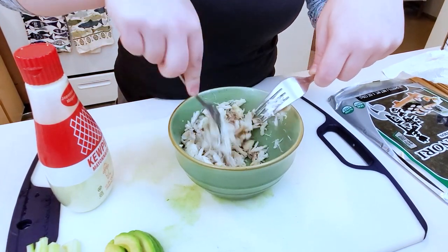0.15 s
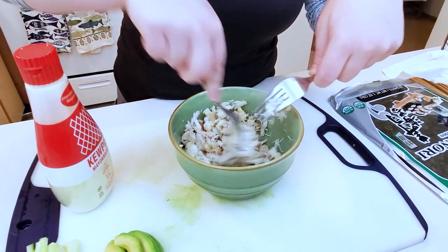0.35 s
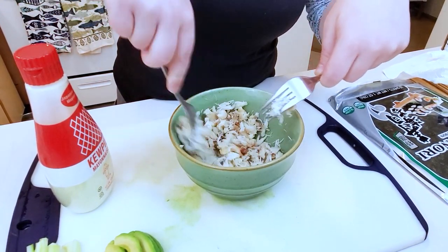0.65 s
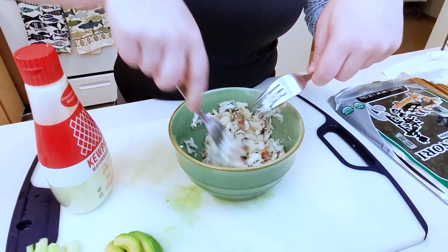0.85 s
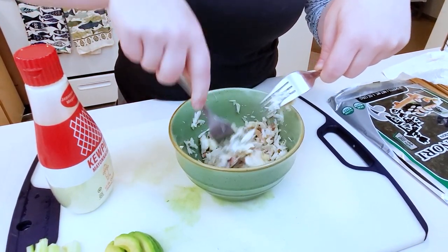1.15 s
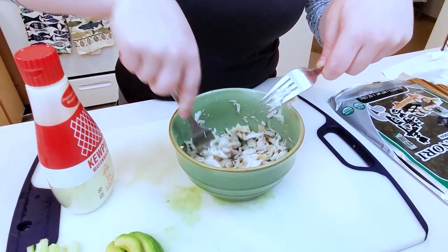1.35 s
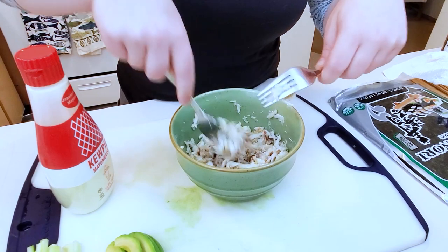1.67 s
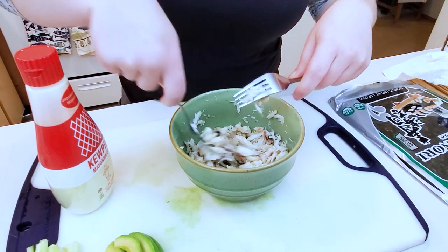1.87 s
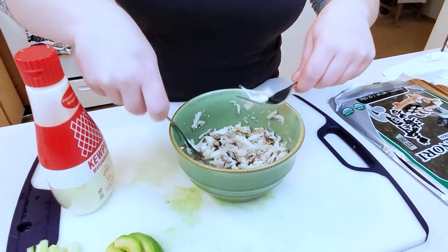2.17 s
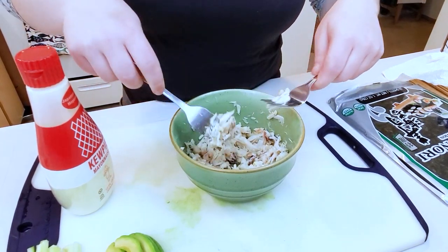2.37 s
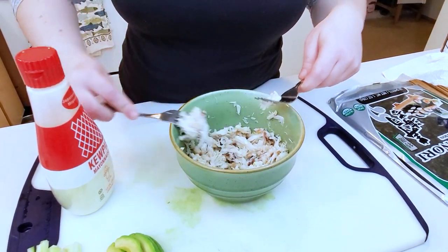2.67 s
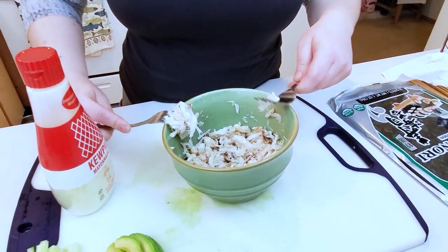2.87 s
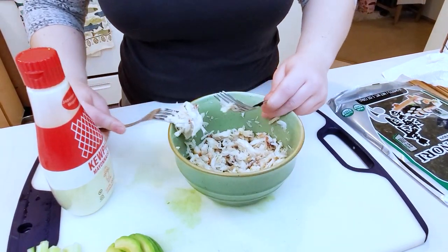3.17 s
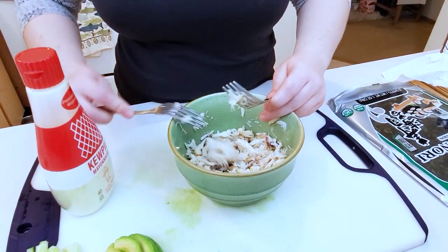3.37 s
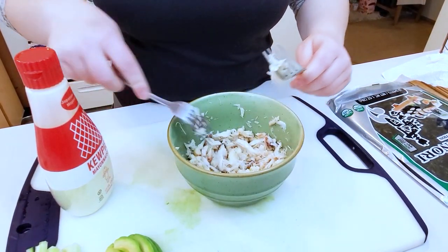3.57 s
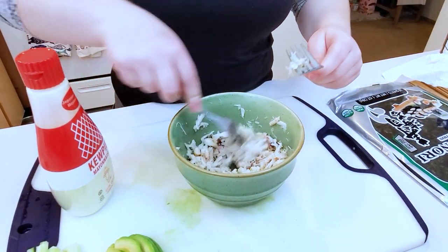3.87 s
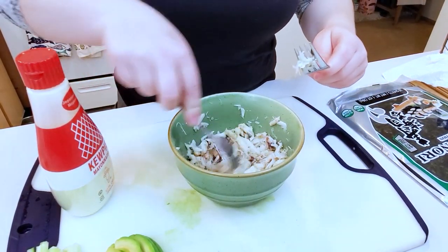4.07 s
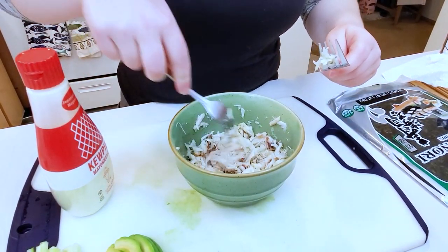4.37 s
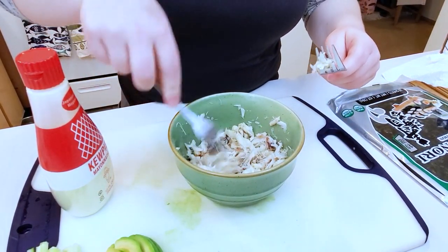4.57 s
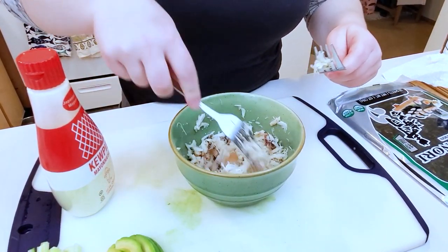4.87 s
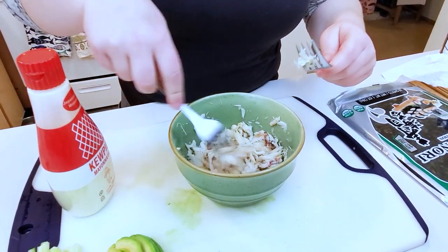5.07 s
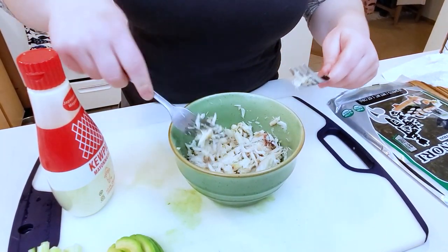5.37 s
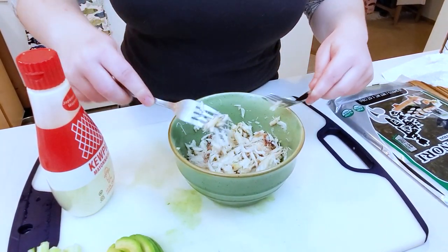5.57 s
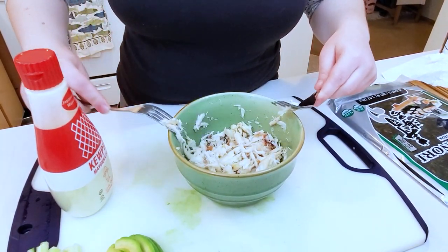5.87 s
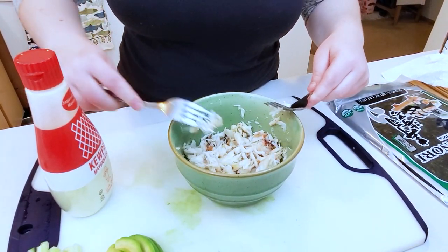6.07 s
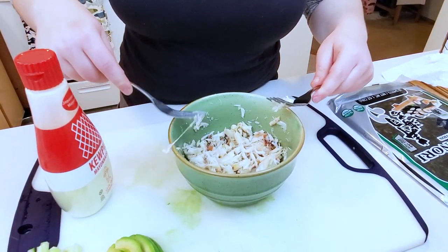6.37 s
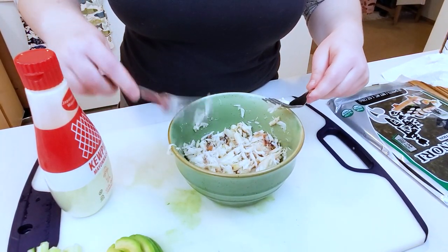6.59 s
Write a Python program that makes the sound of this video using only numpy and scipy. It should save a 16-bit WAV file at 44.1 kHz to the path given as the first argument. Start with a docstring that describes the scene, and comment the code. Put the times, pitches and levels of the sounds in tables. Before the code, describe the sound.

Close-up fork stirring in a ceramic bowl: brisk clinks over moist rustling, then a thump, brief scrapes, soft stirring and a few last ringing taps.

```python
"""A steel fork stirs shredded food in a ceramic bowl on a plastic board in a quiet kitchen.
Each blow is a noise crack plus dying tones of bowl and tines, with a thud in counter and board.
Wet food rustles as dense random snaps, tines scrape the glaze, and one dull knock lands on the board.
Sparse echoes, a low hum and hiss surround them; a spaced pair of microphones hears it from close by."""
import sys
import numpy as np
from scipy import signal
from scipy.fft import rfft, irfft
from scipy.io import wavfile

SR = 44100
rng = np.random.default_rng(int(sys.argv[2]) if len(sys.argv) > 2 else 0)


def wav_out(sig):
    """Save sig, one row per channel (or a flat mono array), as 16-bit PCM at SR to the path in sys.argv[1]."""
    wavfile.write(sys.argv[1], SR, np.round(np.clip(np.atleast_2d(sig).T, -1, 1) * 32767).astype(np.int16))


N = 296793

# Fork blows: start_s, crack_db (bright), dull_db, dull_hz (centre of the dull crack), counter_db, board_db,
# board_hz (its note), bowl_db, bowl_high_db (extra on high modes), fork_db, fork_high_db (extra on high modes),
# left_right_db, stretch (factor on ring length)
FORK_BLOWS = [(0.024, -12, -16.5, 3780, -29, -36, 712, -37, -11, -25, 10.5, 8.5, 0.65),
              (0.2686, -22, -30, 4760, -25, -24, 830, -57, 18.5, -17, -1.5, 8, 0.33),
              (0.5236, -20, -29.5, 2800, -26.5, -35.5, 794, -54, 3, -31.5, 2.5, 10, 0.51),
              (0.7673, -14, -23, 5200, -25, -28, 704, -58, 17, -23.5, 7, 7.5, 0.35),
              (1.062, -39.5, -43, 4380, -40.5, -45.5, 400, -58.5, -3, -36, -12.5, 14.5, 0.18),
              (1.3054, -25.5, -30.5, 2880, -28, -38.5, 400, -77, 13, -23, -7.5, 9, 0.25),
              (1.3416, -40.5, -48.5, 5000, -39.5, -43, 402, -72, 2, -45, 5, -4, 0.67),
              (1.5329, -31, -27, 2570, -24.5, -24, 410, -58, -4.5, -20, -5, 11, 0.38),
              (1.7797, -33, -45, 1970, -37, -52, 369, -60, -10, -45.5, 11, 19.5, 0.26),
              (2.0189, -40.5, -50.5, 3590, -50, -65, 433, -80, 0.5, -51.5, -12.5, 21, 0.34),
              (2.6153, -11.5, -18.5, 3670, -27, -25.5, 920, -25.5, 3, -23, -1, 5.5, 0.78),
              (2.972, -67, -61.5, 3582, -68.5, -73.5, 892, -60, -10.5, -75, 1.5, 5.5, 0.8),
              (3.1119, -13, -17.5, 3800, -30, -41.5, 1060, -31, -9, -39, -7, 9, 0.64),
              (3.2618, -46.5, -48.5, 3520, -45.5, -63.5, 544, -37, -25, -65, 9, 10.5, 0.24),
              (3.3668, -55.5, -67, 3750, -58, -66.5, 414, -51.5, -15, -84, 1.5, 11.5, 0.35),
              (3.7022, -14.5, -25, 2850, -27.5, -30.5, 950, -36.5, 2, -44.5, 26.5, 5.5, 0.78),
              (3.8034, -31, -18.5, 3800, -38.5, -39, 1040, -25.5, 1, -45.5, 10, 6.5, 0.54),
              (3.8226, -34.5, -45.5, 3670, -39.5, -64.5, 1036, -36, -16, -28, -17, 3, 0.49),
              (5.7063, -13.5, -21, 3600, -38.5, -48, 1070, -12.5, -9, -37, 14, 8, 0.73),
              (5.7134, -18, -16, 3480, -30, -37, 1037, -28.5, -3.5, -24.5, 6, 0.5, 1),
              (6.245, -39, -29.5, 3410, -42.5, -36, 865, -31, -8.5, -40, 9.5, 8.5, 1),
              (6.6433, -14, -21, 3400, -39, -57, 810, -12, -13, -52, 8.5, 9, 0.77),
              (6.6662, -15, -22.5, 3600, -43, -65, 853, -33.5, 4, -36, 18.5, 3.5, 0.73)]
# Blows that also ring the fork's handle: start_s, level_db
HANDLE_RAPS = [(0.7672, -37), (3.1116, -36), (3.7023, -26)]
# Bright part of a fork crack: frequency_hz, level_db
CRACK_COLOUR = [(3000, -28.5), (5500, 0), (7000, -1), (11000, -7.5), (15500, 4), (17000, -9)]

# Ringing modes of bowl, fork, counter and board, all with columns
# frequency_hz, level_db, t60_s (before stretching), left_right_db
# Bowl: low belly, main ring, higher rim, highest lip
BELLY_MODES = [(1425, 0, .3, 0), (1443, -2.5, .26, 0), (1480, -4, .08, 0)]
BOWL_MODES = [(3564, 1, .05, 6), (3592, -14, .32, 2), (3700, -12, .05, 0), (3150, -18, .05, 0)]
RIM_MODES = [(4996, -5, .05, 0), (6335, -5, .33, 0), (6395, -3, .12, 0), (8650, -8, .09, 0),
             (8845, -6, .06, 0), (9625, -1, .14, 0), (9790, -4, .08, 0)]
LIP_MODES = [(10250, -4, .03, 0), (10730, -2, .06, -6), (11140, -3, .06, -4), (12700, -3, .05, 3),
             (13090, -1, .07, 3), (13325, -1, .1, 3), (13680, -6, .05, 3)]
# Fork: main ring of the tines, higher neck, highest tips, and the handle; same columns
TINE_MODES = [(6130, -3, .06, 0), (6480, -4, .05, 0), (6680, 0, .07, 0), (6850, -2, .06, 0),
              (7100, -6, .05, 0), (7400, -8, .04, 0), (4830, -14, .06, 0)]
NECK_MODES = [(12020, 0, .05, 0), (11920, -4, .04, 0), (11650, -10, .03, 0)]
TIP_MODES = [(15300, 0, .04, 0), (14930, -3, .06, 0), (15600, -2, .05, 0), (14280, -7, .05, 0)]
HANDLE_MODES = [(867.5, -4, 0.073, 4.5), (1980, -10, 0.044, 3.5), (2797, -3, 0.065, 3.5),
                (4970, -1, 0.051, 9.5)]
# Counter under the board, and the board as the knock rings it; same columns
COUNTER_MODES = [(58.6, -9.5, 0.72, -0.91), (97.5, 4, 0.18, -1.5), (154.8, 0.5, 0.23, -1.5),
                 (217.6, -10, 0.39, 0.27)]
BOARD_MODES = [(220.8, 1, 0.096, -1), (365, -1, .09, 1.5), (910, -8, 0.064, 0.5), (1110, -13, .08, 1),
               (1466, -16.5, 0.059, 0)]
# Noise colour of the rapped board, without its note: frequency_hz, level_db
BOARD_COLOUR = [(150, -23.5), (350, 5), (550, -10), (900, -1), (1300, -8.5), (2200, -6.5), (4000, -37.5)]
# Levels against the main ring of bowl or fork
BELLY_DB, RIM_DB, LIP_DB, NECK_DB, TIPS_DB = -18, 1, 3, 3, 2
WAVER_GROWS_S = 0.01  # a ring starts clean
COUNTER_LAG_S = 0.004  # the push reaches the counter through bowl and board

# Strokes of the fork through wet food: start_s (of full level), level_db, swell_s, hold_s
RUSTLE_STROKES = [(0.012, -53, 0.034, .013), (0.243, -62.5, 0.027, .025), (0.44, -64, .012, 0.12),
                  (0.745, -61, 0.048, 0.02), (1.02, -58, 0.083, 0.02), (1.105, -71, .02, .004),
                  (1.285, -60.5, 0.013, 0.023), (1.515, -53.5, .04, .018), (1.765, -56, 0.02, .015),
                  (1.848, -81.5, .03, 0.0041), (2.003, -59.5, 0.037, .015), (2.16, -83.5, .1, .03),
                  (3.366, -68, .03, 0.0026), (4.142, -70.5, 0.21, .004), (4.505, -76.5, 0.044, 0.056),
                  (4.75, -75, 0.035, 0.098), (5.0, -67.5, 0.056, 0.0068), (5.2, -69.5, 0.028, .006)]
# Colour of the wet rustle: frequency_hz, level_db (per Hz)
RUSTLE_COLOUR = [(1200, -37), (2000, -12), (3900, -6), (4900, -4), (8900, -8), (15500, -3), (16200, -34.5)]
# Tines dragging along the glaze: start_s (of full level), level_db, swell_s, hold_s
SCRAPE_STROKES = [(1.025, -62.5, 0.037, 0.025), (1.09, -75, 0.016, .015), (2.04, -91, .015, .06),
                  (3.14, -52, .015, 0.13), (3.73, -51.5, .015, 0.039)]
# Colour of the scrape: frequency_hz, level_db (per Hz)
SCRAPE_COLOUR = [(470, -27), (800, -20), (1300, -12), (1440, 14), (1650, -13), (3160, -17), (3580, 11),
                 (4000, -37), (8360, -18.5), (11900, -5.5), (15800, -16)]
RUSTLE_FADE_DB_PER_S, SCRAPE_FADE_DB_PER_S = 187, 598.5
SWELL_DB = 36  # rise of a stroke over its swell time

# Small ticks of tines and wet shreds: start_s, level_db, centre_hz, left_right_db
TICKS = [(0.438, -57, 6310, 9), (0.465, -65, 4300, 18), (0.973, -50, 14500, 12), (1.006, -57.5, 4250, 24),
         (1.0543, -59, 6300, 18), (2.0056, -54.5, 5870, 18), (2.161, -68, 4600, 18),
         (2.516, -46.5, 13300, 9), (4.5531, -58.5, 13570, 14), (4.7483, -61, 14640, 15),
         (4.7664, -61, 12700, 15), (4.8273, -55, 14000, 16), (4.8894, -64, 13400, 13),
         (5.113, -65.5, 12300, 14.5), (5.2754, -56.5, 14230, 11.5), (6.4554, -54.5, 5380, 2.5),
         (6.5676, -52, 12000, -5)]
# Hollow clicks just before the last blows: start_s, level_db, centre_hz, left_right_db
CLICKS = [(6.551, -33, 2450, -5.5), (6.5533, -41, 1250, -10), (6.567, -44, 3000, -3),
          (6.5817, -45, 2100, -4), (6.5932, -30.5, 2850, -2)]
# Soft thuds on the counter: start_s, counter_db, board_db
THUDS = [(0.458, -55, -58), (0.559, -33.5, -34), (0.807, -33, -33), (0.844, -63, -62), (0.999, -47, -68),
         (1.099, -55, -58), (1.58, -43, -64.5), (1.81, -58, -49), (2.66, -59, -31.5), (3.188, -52, -63),
         (5.039, -53, -73.5), (5.183, -46.5, -68)]
# Colour of the dull knock: frequency_hz, level_db (per Hz)
KNOCK_COLOUR = [(40, -17), (100, -7), (230, -6.5), (550, -14), (860, -9), (1500, -9.5), (3000, -17),
                (5500, -33), (7500, -51), (16000, -46)]
# Widths are frequency ratios
TICK_T60_S, TICK_WIDTH, TICK_TREBLE_DB = 0.021, 1.3, -22
CLICK_T60_S, CLICK_WIDTH, CLICK_TREBLE_DB = 0.014, 1.24, -28
KNOCK_S, KNOCK_DB, KNOCK_RING_DB, KNOCK_PAN_DB = 3.0012, -14, -18.5, 6
KNOCK_COUNTER_DB, KNOCK_BOARD_DB = -12, -19.5

# Echoes of the kitchen: frequency_hz, t60_s, echo_db
KITCHEN_ECHO = [(59.4, 0.86, -11), (160, 0.47, -13.5), (390.2, 0.35, 0), (1070, 0.33, -3), (3170, 0.3, -3),
                (8250, 0.32, -6), (15500, 0.18, -8), (16070, .1, -34.5)]
# Colour of hum and hiss: frequency_hz, level_db (per Hz)
HUSH_COLOUR = [(30, -21.5), (48, -10.5), (63, 3), (85, -12), (160, -7), (250, -11.5), (400, -17.5),
               (800, -24), (1050, -30), (2000, -37.5), (4000, -45.5), (8000, -47), (15500, -47.5),
               (16200, -73.5)]
# Likeness of the hush at the two microphones: frequency_hz, likeness (-1 to 1)
HUSH_LIKENESS = [(60, 0.67), (180, 0.85), (550, 0.18), (1650, 0.97), (4970, 0.04), (15000, -0.21)]
HUSH_DB = -62.5
# Microphone response with a dip of the housing: frequency_hz, level_db
MICROPHONE_COLOUR = [(0, 0), (7000, 0.5), (8000, -5), (8900, 2), (22050, -6.5)]
LAG_SAMPLES = 12  # the right microphone is farther away
BASS_CUT_HZ, EDGE_HZ = 51, 17000


def fork():
    """Steel on glaze: a crack, the rings of bowl and fork, the push into the counter."""
    mix = np.zeros((2, N))
    for (s, crack_db, dull_db, dull_hz, counter_db, board_db, board_hz,
         bowl_db, bowl_high_db, fork_db, fork_high_db, pan_db, stretch) in FORK_BLOWS:
        bright = burst(CRACK_COLOUR, crack_db, t60=0.017, rise_s=0.00029)
        dull = burst(hump(dull_hz, -4.5, -6.5, 1.15), dull_db, t60=0.027, rise_s=0.00082)
        add(mix, s, bright + dull, pan_db)
        upper_bowl_db = bowl_db + bowl_high_db
        upper_fork_db = fork_db + fork_high_db
        parts = [(BELLY_MODES, bowl_db + BELLY_DB),
                 (BOWL_MODES, bowl_db),
                 (RIM_MODES, upper_bowl_db + RIM_DB),
                 (LIP_MODES, upper_bowl_db + LIP_DB),
                 (TINE_MODES, fork_db),
                 (NECK_MODES, upper_fork_db + NECK_DB),
                 (TIP_MODES, upper_fork_db + TIPS_DB)]
        for modes, db in parts:
            tones = ring(modes, db, stretch, scatter_db=1.5, rise_s=0.0015, waver=0.27)
            add(mix, s, tones, pan_db)
        thud(mix, s, counter_db, board_db, board_hz)
    return mix


def ring(modes, db, stretch, scatter_db, rise_s, waver):
    """Dying tones; each blow weighs the modes anew, and they waver as the object moves and touches food."""
    hz, level_db, t60, pan_db = (column[:, None] for column in np.transpose(modes))
    t60 = t60 * np.clip(stretch, 0.2, 3)
    spot, drift = rng.standard_normal((2, len(modes), 1))
    a, b = rng.standard_normal((2, 2, len(modes), 64))
    # One random waver value per 256 samples, smoothly joined
    steps = int(np.clip(t60.max() * SR / 256, 2, 64))
    t = np.arange(steps * 256) / SR
    wander = signal.resample((a + 1j * b)[..., :steps], len(t), axis=-1)
    wobble = 1 + waver * (1 - np.exp(-t / WAVER_GROWS_S)) * wander
    fade = gain_of(db + level_db + scatter_db * spot - 60 * t / t60)
    fade = fade * (1 - np.exp(-t / rise_s))
    carrier = np.exp(2j * np.pi * hz * (1 + 0.0029 * drift) * t)
    tones = fade * (wobble * carrier).imag
    return (tones * gain_of([pan_db / 2, -pan_db / 2])).sum(1)


def burst(colour, db, t60, rise_s, unlike=1.0):
    """A dying burst of coloured noise, partly unlike at the two microphones."""
    t = np.arange(4096) / SR
    a, b = rng.standard_normal((2, len(t)))
    noise = coloured(np.array([a, a + unlike * b]), colour)
    return noise * gain_of(db - 60 * t / t60) * (1 - np.exp(-t / rise_s))


def thud(mix, s, counter_db, board_db, board_hz):
    """The bowl pushes on the counter and raps the board, whose note depends on the spot."""
    push = -ring(COUNTER_MODES, counter_db, stretch=0.5, scatter_db=0.18, rise_s=0.0029, waver=0)
    add(mix, s + COUNTER_LAG_S, push)
    hz = np.geomspace(100, 5000, 40)
    note_db = 7 * np.exp(-(np.log2(hz / board_hz) / 0.1) ** 2)
    colour = np.transpose([hz, read(BOARD_COLOUR, hz) + note_db])
    add(mix, s, burst(colour, board_db, t60=0.019, rise_s=0.00012, unlike=0.36))


def food():
    """Wet shreds snap under the fork; tines stutter along the glaze."""
    rustle_level = strokes(RUSTLE_STROKES, RUSTLE_FADE_DB_PER_S)
    scrape_level = strokes(SCRAPE_STROKES, SCRAPE_FADE_DB_PER_S)
    rustle = snaps(rustle_level, RUSTLE_COLOUR, per_s=3000, spread_db=2.8, smooth=0.3)
    scrape = snaps(scrape_level, SCRAPE_COLOUR, per_s=1200, spread_db=0.96, smooth=0.43)
    return rustle + scrape


def strokes(rows, fade_db_per_s):
    """Level of a series of strokes: each swells, holds and fades."""
    t = np.arange(0, N, 32) / SR
    level = np.zeros(len(t))
    for s, db, swell_s, hold_s in rows:
        below_db = SWELL_DB * np.maximum(s - t, 0) / swell_s
        faded_db = fade_db_per_s * np.maximum(t - s - hold_s, 0)
        level += gain_of(db - below_db - faded_db)
    return np.interp(np.arange(N) / SR, t, level)


def snaps(level, colour, per_s, spread_db, smooth):
    """Dense random clicks, a few of them large, over a little smooth noise."""
    size = gain_of(spread_db * np.minimum(rng.exponential(1, N), 5))
    size = size * (rng.random(N) < per_s / SR)
    clicks = size * rng.choice([-1, 1], N)
    noise = smooth * rng.standard_normal((2, N))
    return level * coloured(clicks + noise, colour)


def small_sounds():
    """Short noise peaks for ticks and clicks, tones for the handle, thuds and the knock on the board."""
    mix = np.zeros((2, N))
    for s, db, hz, pan_db in TICKS:
        colour = hump(hz, -14, TICK_TREBLE_DB, TICK_WIDTH)
        add(mix, s, burst(colour, db, TICK_T60_S, rise_s=0.0002), pan_db)
    for s, db, hz, pan_db in CLICKS:
        colour = hump(hz, -16, CLICK_TREBLE_DB, CLICK_WIDTH)
        add(mix, s, burst(colour, db, CLICK_T60_S, rise_s=0.00089), pan_db)
    for s, db in HANDLE_RAPS:
        add(mix, s, ring(HANDLE_MODES, db, stretch=0.85, scatter_db=1.5, rise_s=0.00061, waver=0.4))
    for s, counter_db, board_db in THUDS:
        thud(mix, s, counter_db, board_db, board_hz=950)
    knock = burst(KNOCK_COLOUR, KNOCK_DB, t60=0.095, rise_s=0.00022, unlike=0.25)
    add(mix, KNOCK_S, knock, KNOCK_PAN_DB)
    board = ring(BOARD_MODES, KNOCK_RING_DB, stretch=1, scatter_db=1.1, rise_s=0.0006, waver=0.3)
    add(mix, KNOCK_S, board)
    thud(mix, KNOCK_S, KNOCK_COUNTER_DB, KNOCK_BOARD_DB, board_hz=700)
    return mix


def kitchen(x):
    """Sparse echoes of random sign, each band dying at its own speed; the bass is alike at both microphones."""
    taps = np.zeros((2, SR // 2))
    # One echo falls at random in each slot of 12 samples
    slots = np.arange(250, SR // 2 - 20, 12)
    at = slots + rng.integers(0, 12, (2, len(slots)))
    np.put_along_axis(taps, at, rng.choice([-1., 1.], at.shape), 1)
    hz, t, z = signal.stft(taps, SR, nperseg=512)
    z[1, hz < 300] = z[0, hz < 300]
    t60 = read(KITCHEN_ECHO, hz)[:, None]
    echo_db = read(KITCHEN_ECHO, hz, column=2)[:, None]
    # Echo strength is evened out for the length of the decay
    energy = t60 * SR / 12 / (2 * np.log(1000))
    z = z * gain_of(echo_db - 60 * t / t60) / np.sqrt(energy)
    tail = signal.istft(z, SR, nperseg=512)[1]
    tail *= np.clip((np.arange(tail.shape[1]) - 100) / 150, 0, 1)  # the first echo needs a few ms
    return signal.fftconvolve(x, tail, axes=1)[:, :N]


def hush():
    """Low hum of the house and microphone hiss as shaped noise, its level wavering below 300 Hz."""
    a, b, c, d = rng.standard_normal((N // 512 + 5, 1025, 4)).T
    hz = np.fft.rfftfreq(2048, 1 / SR)
    t = np.arange(a.shape[1]) * 512 / SR
    swell = np.zeros(len(t))
    for rate_hz in np.geomspace(0.3, 5, 20):
        swell += np.sin(2 * np.pi * (rate_hz * t + rng.random())) / np.sqrt(rate_hz)
    swell_db = 2.2 * evened(swell) * (hz < 300)[:, None]
    same = np.clip(read(HUSH_LIKENESS, hz), -1, 1)[:, None]
    left = a + 1j * b
    right = same * left + np.sqrt(1 - same ** 2) * (c + 1j * d)
    z = np.array([left, right]) * gain_of(read(HUSH_COLOUR, hz)[:, None] + swell_db)
    noise = signal.istft(z, nperseg=2048, noverlap=1536)[1][:, :N]
    return gain_of(HUSH_DB) * evened(noise)


def gain_of(db):
    """Decibels to gain."""
    return 10 ** (np.asarray(db) / 20)


def evened(x):
    """Scales to rms 1."""
    return x / np.sqrt(np.mean(x ** 2) + 1e-20)


def read(points, hz, column=1):
    """Reads a table on a log-frequency axis."""
    points = np.transpose(points)
    return np.interp(np.log(hz + 1), np.log(points[0] + 1), points[column])


def coloured(x, points):
    """Shapes the spectrum of noise, rms 1."""
    hz = np.fft.rfftfreq(x.shape[-1], 1 / SR)
    return evened(irfft(rfft(x) * gain_of(read(points, hz)), x.shape[-1]))


def hump(hz, below_db, above_db, width):
    """A spectrum with one peak."""
    return [(hz / width ** 3, 2 * below_db),
            (hz / width, below_db),
            (hz, 0),
            (hz * width, above_db),
            (hz * width ** 5, above_db - 6)]


def add(mix, s, sound, pan_db=0):
    """Places a sound in both channels; positive pan leans left."""
    part = mix[:, max(round(s * SR), 0):][:, :sound.shape[-1]]
    panned = sound * gain_of([[pan_db / 2], [-pan_db / 2]])
    part += panned[:, :part.shape[1]]


def scene():
    """Near sounds and their echoes, later at the right microphone, over the hush."""
    near = fork() + food() + small_sounds()
    heard = near + kitchen(near)
    heard[1] = np.r_[np.zeros(LAG_SAMPLES), heard[1, :-LAG_SAMPLES]]
    return heard + hush()


def record(dry):
    """Bass cut and microphone colour, then the band limit."""
    hz, db = np.transpose(MICROPHONE_COLOUR)
    colour = signal.firwin2(255, np.r_[0, hz[1:-1], SR / 2], gain_of(db), fs=SR)
    edge = signal.firwin(511, EDGE_HZ, window=("kaiser", 12), fs=SR)
    bass_cut = signal.butter(N=2, Wn=BASS_CUT_HZ, btype="high", fs=SR, output="sos")
    cut = signal.sosfilt(bass_cut, dry)
    return signal.oaconvolve(cut, np.convolve(colour, edge)[None], "same")


dry = scene()
out = record(dry)
wav_out(out)
```